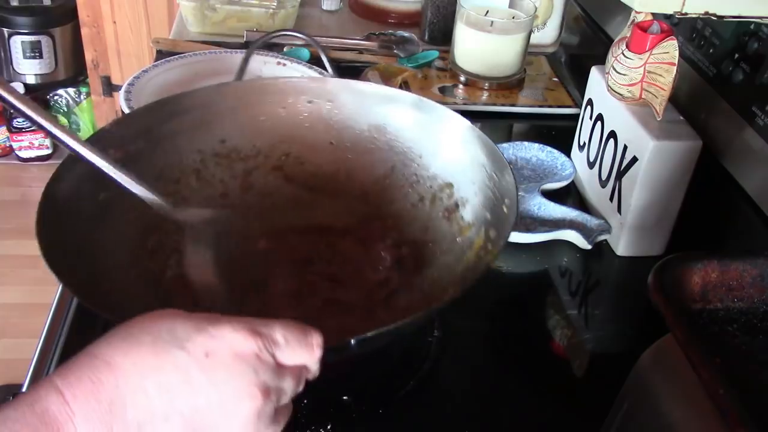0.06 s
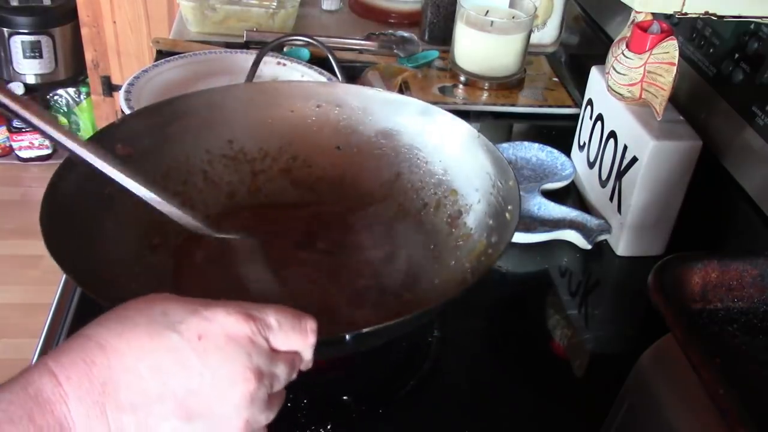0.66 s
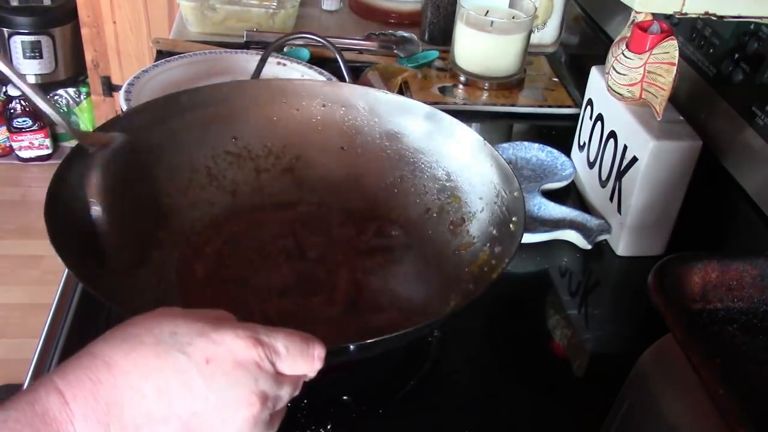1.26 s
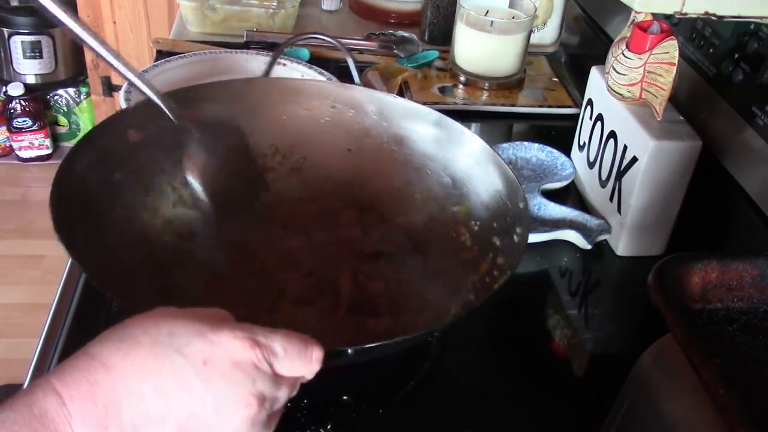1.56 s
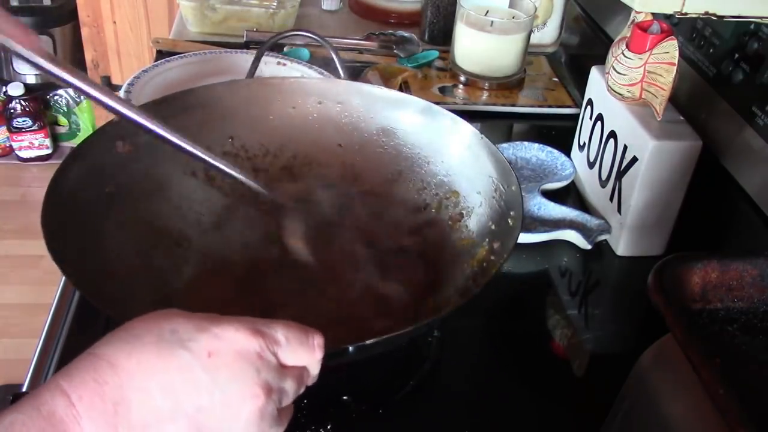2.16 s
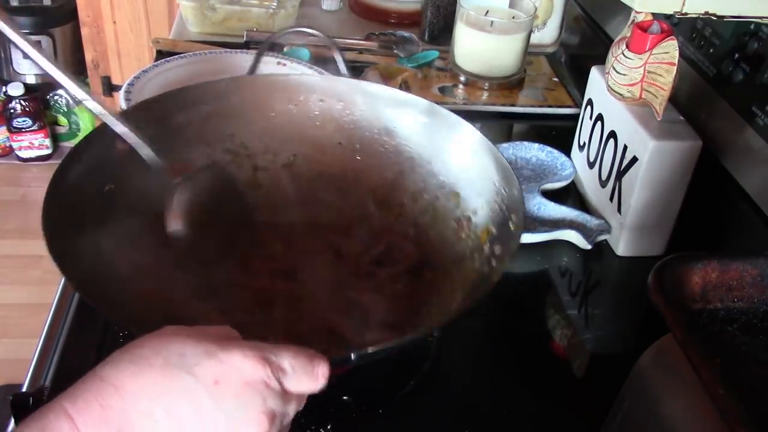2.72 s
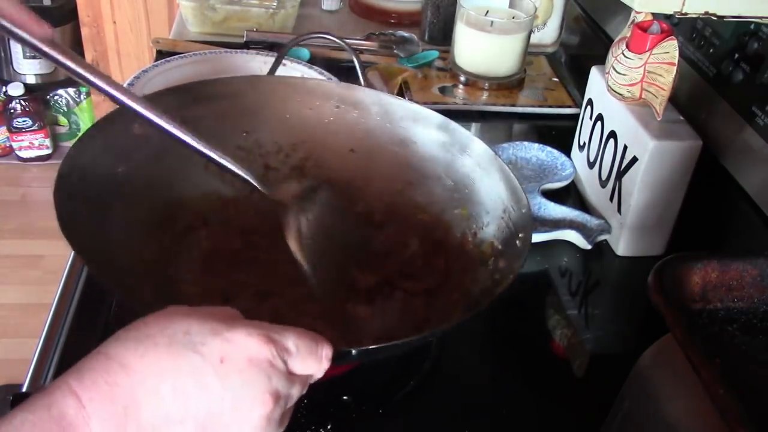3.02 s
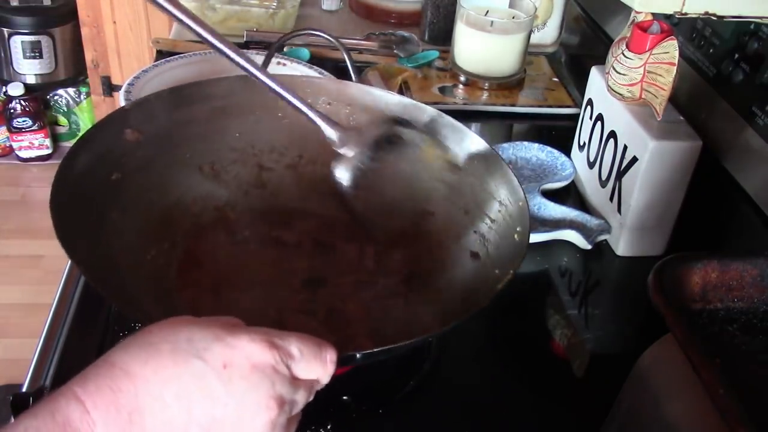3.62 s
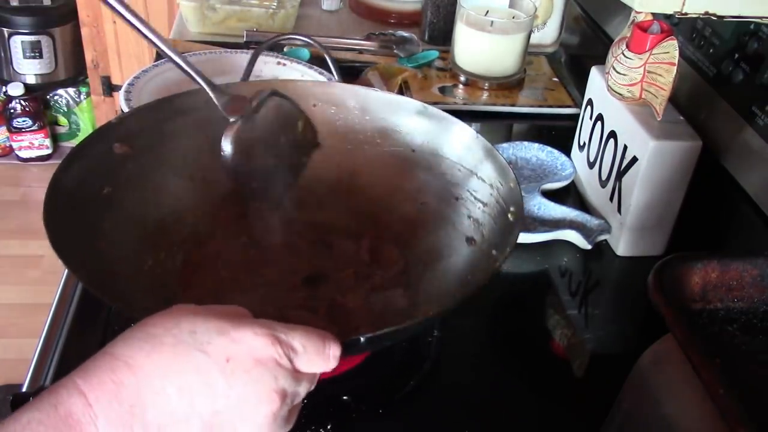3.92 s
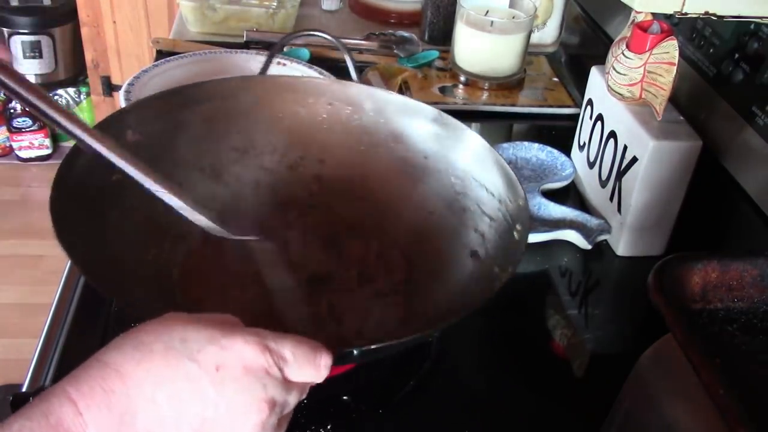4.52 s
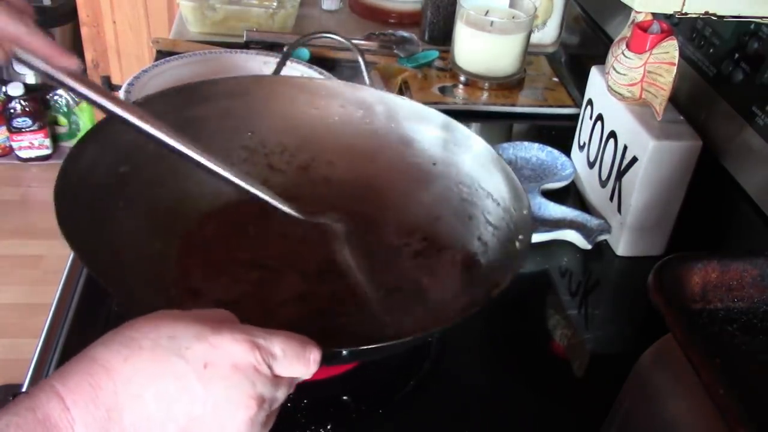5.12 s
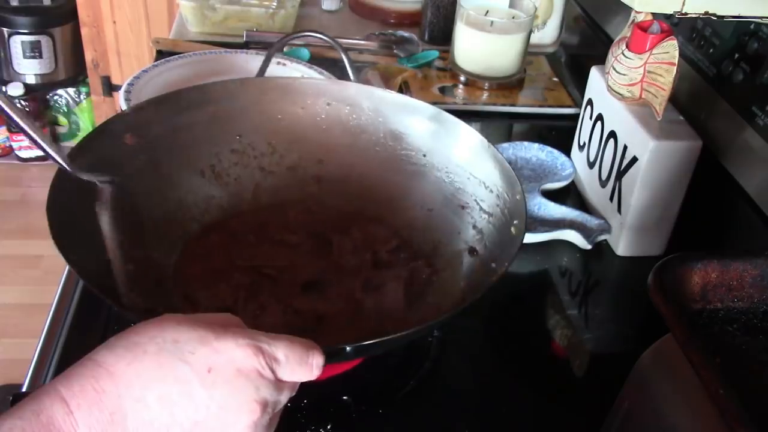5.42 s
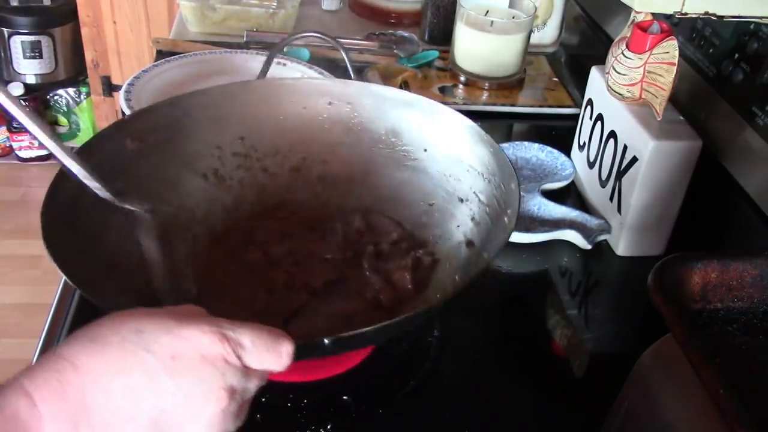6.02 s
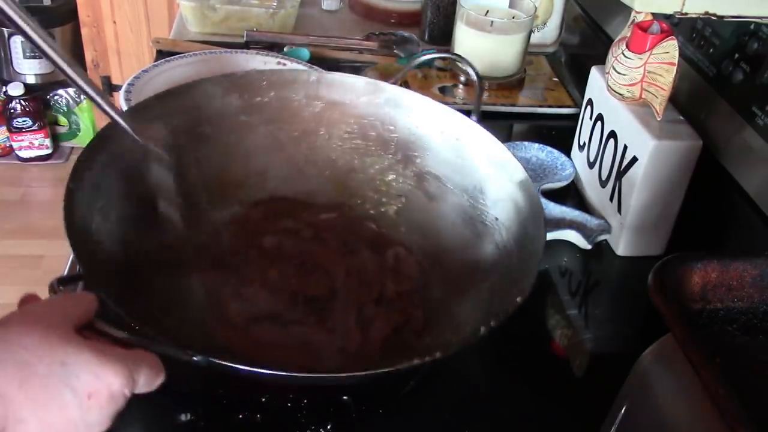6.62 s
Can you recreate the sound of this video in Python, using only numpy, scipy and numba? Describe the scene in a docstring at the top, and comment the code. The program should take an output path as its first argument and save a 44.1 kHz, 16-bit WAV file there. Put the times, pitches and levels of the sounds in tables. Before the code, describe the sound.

A long steel ladle clanks and scrapes in a wok, stirring faintly sizzling food, the metal ringing briefly between strokes.

```python
"""A short sizzle and a soft bump, then close clanks: a long steel ladle stirs food in a hand-held wok.
Each stroke lands with a clank that favours a few of the wok's own tones (its modes), skids, then is
pushed through the food; the bowl's resonances glide with the point of contact.
Ladle and wok ring on faintly between strokes. The wok bumps on the hob, and the food sizzles and
spits on the hot steel, over the steady low noise of a small kitchen."""
import sys
import numpy as np
from scipy import signal
from scipy.fft import rfft, irfft, next_fast_len
from scipy.io import wavfile
from scipy.ndimage import uniform_filter1d, minimum_filter1d
from numba import njit

SR = 44100
rng = np.random.default_rng(int(sys.argv[2]) if len(sys.argv) > 2 else 0)


def inscribe(sig):
    """Save sig as 16-bit PCM at rate SR to the path in sys.argv[1].

    A 1-D sig is mono; a 2-D sig holds one channel per row.
    Samples are clipped to [-1, 1] before scaling.
    """
    pcm = np.round(np.clip(np.atleast_2d(sig).T, -1, 1) * 32767)
    wavfile.write(sys.argv[1], SR, pcm.astype(np.int16))


N = 298557
TIME = np.arange(N) / SR
THUD, BOWL, CLANG, EDGE = range(4)   # the wok's four pitch ranges, from low to high

# the ladle hits the wok:
# (time [s], edge level [dB], bowl level [dB], clang level [dB], clang pitch [Hz], skid length [s])
STRIKES = [(0.4763, -8, -20, -10.5, 1380, 0.11), (0.737, -21.5, -33.5, -24.5, 1140, 0.00079),
           (1.1313, -7.5, -21.5, -18, 1407, 0.0043), (1.3695, -17.5, -31.5, -27.5, 1510, 0.0087),
           (1.6926, -3.5, -21, -14.5, 1336, 0.057), (1.7206, -2.5, -23, -33, 1733, 0),
           (2.2163, -34.5, -35, -30.5, 1385, 0), (2.4676, -12.5, -13, -13, 1230, 0.012),
           (2.597, -32, -39, -38, 1450, 0.046), (3.3389, -10.5, -15, -11, 1360, 0.017),
           (3.422, -24, -29, -20, 1306, 0.0053), (3.503, -18.5, -48, -56.5, 1270, 0),
           (3.704, -19, -34.5, -16, 1255, 0), (3.76, -24, -40.5, -27.5, 1260, 0.052),
           (3.885, -50, -40.5, -37, 1266, 0), (4.2289, -7, -13.5, -9.5, 1325, 0.028),
           (4.6248, -20, -35, -25.5, 1350, 0.02), (4.8744, -24.5, -26.5, -28.5, 1250, 0),
           (5.3649, -7.5, -20.5, -13, 1282, 0.075), (5.396, -4, -18.5, -13, 1400, 0.027),
           (5.5483, -20.5, -21.5, -22, 1200, 0.028), (5.617, -20.5, -45.5, -31.5, 1492, 0),
           (5.9184, -3, -15.5, -9, 1350, 0.058), (6.262, -8, -17.5, -12, 1347, 0.0086),
           (6.3738, -25, -24.5, -26.5, 1580, 0.051), (6.4376, -23.5, -26.5, -27.5, 1250, 0.00041),
           (6.7152, -5, -28, -15.5, 1895, 0), (6.7277, -2.5, -19, -37, 1650, .04)]


def from_db(db):
    """Turn decibels into a volume factor."""
    return 10 ** (np.asarray(db) / 20)


def unit_power(x):
    """Scale a sound to an average power of 1."""
    return x / np.sqrt(np.mean(x ** 2) + 1e-20)


def gain_at(colour, hz):
    """Read a tone colour, given as rows of (pitch [Hz], level [dB]), at any pitch."""
    colour = np.array(colour)
    return from_db(np.interp(np.log(hz + 1e-9), np.log(colour[:, 0]), colour[:, 1]))


def filtered(x, colour):
    """Give a sound a tone colour."""
    size = next_fast_len(N)
    return irfft(rfft(x, size) * gain_at(colour, np.fft.rfftfreq(size, 1 / SR)), size)[:N]


def band(x, which):
    """Keep one of the wok's four pitch ranges."""
    borders_hz = [110, 350, 1100, 2100, 16500]   # where the ranges begin and end (pitch [Hz])
    bandpass = signal.butter(3, borders_hz[which:which + 2], "band", fs=SR, output="sos")
    return signal.sosfilt(bandpass, x + 1e-18)


def add(out, s, sound):
    """Mix a sound in, starting at s seconds."""
    start = max(round(s * SR), 0)
    out[start:start + len(sound)] += sound[:N - start]


def fading_tone(t, hz, level_db, t60):
    """One ringing mode; t60 is the seconds it takes to fade by 60 dB."""
    return np.sin(2 * np.pi * hz * t) * from_db(level_db - 60 * t / t60)


def drift(per_s):
    """A random wander with a typical size of 1."""
    return unit_power(np.interp(TIME * per_s, np.arange(N // 20), rng.standard_normal(N // 20)))


def evened(x):
    """Flatten swells in loudness but keep the fine roughness."""
    return x / np.sqrt(np.abs(uniform_filter1d(x ** 2, SR // 36)) + 1e-12)


def clicks(per_s, spread_db):
    """Random clicks of very uneven size."""
    sizes = from_db(spread_db * np.minimum(rng.exponential(1, N), 5)) * rng.choice([-1, 1], N)
    return unit_power(sizes * (rng.random(N) < per_s / SR))


@njit
def vibrate(x, angle, decay):
    """Each sample, a vibration turns by an angle, shrinks a little and is pushed by x."""
    out, state = np.zeros(len(x)), 0j
    for i in range(len(x)):
        state = state * decay * np.exp(1j * angle[i]) + x[i]
        out[i] = state.real
    return out


def resonance(x, hz, width_hz):
    """Make x ring at a moving pitch and an even level; a smaller width gives a purer tone."""
    return evened(vibrate(x, 2 * np.pi * hz / SR, np.exp(-np.pi * width_hz / SR)))


def kitchen_noise(level_db):
    """The kitchen's steady, low background noise."""
    # (pitch [Hz], level [dB])
    colour = [(25, -42), (120, -1), (207, 0), (250, -9), (301, 0.5), (740, -6.5),
              (1100, -9), (3000, -14), (11500, -40), (15000, -51.5)]
    return from_db(level_db) * unit_power(filtered(rng.standard_normal(N), colour))


def room_echo(x, t60, cutoff_hz):
    """Dense, dull reflections from the walls of a small kitchen."""
    t = np.arange(SR // 2) / SR
    tail = rng.standard_normal(len(t)) * from_db(-60 * t / t60) * (t > .004)
    tail = signal.lfilter(*signal.butter(1, cutoff_hz, fs=SR), tail)
    return signal.oaconvolve(x, tail / np.linalg.norm(tail))[:N]


def sizzle_and_ticks(flare_db, tick_s, small_spit_db, small_spits):
    """Tiny bubbles burst where food meets hot steel; spitting fat and one ladle touch make ticks."""
    # the sizzle flares up: (peak time [s], rise [s], fall [s], level [dB])
    sizzles = [(.21, 0.16, 0.12, -43), (1.05, 0.15, 0.36, -58.5), (2.75, 0.13, 0.31, -57.5),
               (5.635, .008, 0.05, -39), (6.19, .08, .12, -50.5)]
    # tone colour of the bubbles: (pitch [Hz], level [dB])
    colour = [(1500, -2.5), (5400, 1), (7200, 0), (9000, -5.5), (12000, -12), (15500, -22)]
    # sharp ticks: drops of fat spit, and at 2.04 s the ladle touches the wok
    # (time [s], peak level [dB], pitch [Hz])
    ticks = [(1.496, -36, 8400), (1.546, -32, 3060), (2.0408, -21.5, 4000), (2.8835, -45, 9100),
             (6.557, -26.5, 7200)]
    flares = sum(from_db(db) * np.exp(-np.maximum((s - TIME) / rise_s, (TIME - s) / fall_s))
                 for s, rise_s, fall_s, db in sizzles)
    simmer = from_db(-75.5 - 4.5 * TIME)   # dies down as the food is turned
    bubbles = unit_power(filtered(clicks(per_s=9400, spread_db=2.0), colour))
    out = bubbles * np.hypot(from_db(flare_db) * flares, simmer)
    t = np.arange(SR // 25) / SR
    small = [(when * N / SR, small_spit_db + 12 * size ** 3, 3000 * 4 ** pitch)
             for when, size, pitch in rng.random((small_spits, 3))]
    for s, peak_db, hz in ticks + small:
        burst = rng.standard_normal(len(t)) * np.exp(-t / tick_s)
        pop = signal.sosfilt(signal.butter(2, [hz / 1.2, hz * 1.2], "band", fs=SR, output="sos"), burst)
        add(out, s, pop / np.abs(pop).max() * from_db(peak_db))
    return out


def hob_bumps(gain_db, rock_s):
    """The wok's round bottom rocks briefly on the hob and stirs its lowest modes."""
    # the wok meets the hob: (time [s], level [dB])
    bumps = [(0.144, -36.5), (0.574, -27), (1.386, -33.5), (2.892, -38.5), (5.549, -22), (5.599, -33.5),
             (6.456, -35)]
    # its lowest modes: (pitch [Hz], level [dB], fade time [s])
    modes = [(132, -6.5, 0.099), (167, -6, 0.16), (178, 7, 0.042), (291, -1, 0.083), (365, 2, 0.053)]
    out, t = np.zeros(N), np.arange(SR // 3) / SR
    body = sum(fading_tone(t, *mode) for mode in modes)
    for s, level_db in bumps:
        rocking = rng.standard_normal(len(t)) * t * np.exp(-t / rock_s)
        bump = band(band(signal.fftconvolve(rocking, body), THUD), THUD)
        add(out, s - rock_s, bump / np.abs(bump).max() * from_db(level_db + gain_db))
    return out


def after_rings():
    """A few modes ring on until the next ring starts; the ladle's two close tones make a wobble."""
    # ringing starts: (time [s], ladle level [dB], wok level [dB])
    rings = [(0.476, -44, -34), (1.72, -35, -36), (2.04, -58, -46), (2.467, -57, -40), (3.339, -37.5, -43),
             (4.229, -51, -46), (4.95, -58, -39), (5.919, -29.5, -37)]
    # long-lasting modes of each: (pitch [Hz], level [dB], fade time [s])
    ladle_modes = [(1669, -6, 2), (1691, 0, 2.1), (2735, -11, 1.4)]
    wok_modes = [(502, 2, .6), (727, -4.5, 2.1)]
    out = np.zeros(N)
    ends = [row[0] for row in rings[1:]] + [N / SR]
    for (s, ladle_db, wok_db), end in zip(rings, ends):
        t = np.arange(round((end - s) * SR)) / SR
        for modes, blow_db in ((ladle_modes, ladle_db), (wok_modes, wok_db)):
            for hz, level_db, t60 in modes:
                add(out, s, fading_tone(t, hz, blow_db + level_db, t60))
    return out


def wok_taps(count, width_hz, weak_db, weak_width_hz, width_per_khz, scatter_db):
    """The wok tapped at several places: always the same modes, but each place has its own mix."""
    # main modes of the wok with the ladle on it: (pitch [Hz], level [dB])
    modes = [(166, -16), (556, -3), (667.5, -11), (762, -11), (865, -10), (986, -8), (1263, -3), (1300, -6),
             (1345, -2), (1770, -13), (2251, -18), (2392, -14), (2733, -19), (3624, -13), (3711, -13),
             (4150, -10), (4328, -10), (4814, -13), (6528, -14), (6910, -14), (8507, -15)]
    # tone colour of its many weaker modes: (pitch [Hz], level [dB])
    colour = [(100, -35), (400, -8), (550, 3), (700, 2), (900, 4), (1100, -4), (1350, -3.5), (2000, -12),
              (3100, -2), (4300, 3.5), (5800, 0), (8500, -3.5), (11000, -4.5), (15500, -22)]
    t = np.arange(SR // 3) / SR
    hz, level_db = np.transpose(modes)
    weak_hz = np.linspace(np.sqrt(100), np.sqrt(16000), 360) ** 2 * rng.uniform(.99, 1.01, 360)
    strong = from_db(level_db + scatter_db * rng.standard_normal((count, len(hz))))
    strong *= rng.choice([-1, 1], strong.shape)
    weak = from_db(weak_db) * gain_at(colour, weak_hz) * rng.standard_normal((count, len(weak_hz)))
    widths = np.r_[np.full(len(hz), width_hz), weak_width_hz + width_per_khz * weak_hz / 1000]
    tones = np.sin(np.outer(2 * np.pi * np.r_[hz, weak_hz], t).astype("f4"))
    fades = np.exp(np.maximum(np.outer(-np.pi * widths, t), -40).astype("f4"))   # wider fades faster
    return np.hstack([strong, weak]) @ (tones * fades)


def whines(friction, gain_db):
    """Under pressure, rubbing makes one resonance swell, glide with the point of contact and fade."""
    # the rim whines: (time [s], length [s], level [dB], first pitch [Hz], last pitch [Hz])
    glides = [(2.04, 0.13, -33, 1750, 1920), (2.041, .14, -30, 2520, 2930), (2.091, 0.11, -26, 370, 388),
              (3.503, .16, -23.5, 1320, 1520), (3.536, 0.16, -25, 1200, 1225),
              (3.569, 0.17, -30.5, 2214, 2650), (4.314, 0.053, -22, 1315, 1416),
              (4.993, 0.082, -25, 1161, 1195)]
    out = np.zeros(N)
    for s, length_s, level_db, first_hz, last_hz in glides:
        progress = np.clip((TIME - s) / length_s, 0, 1)
        tone = resonance(friction, first_hz + (last_hz - first_hz) * progress, width_hz=first_hz / 70)
        out += tone * np.sin(np.pi * progress) * from_db(level_db + gain_db)
    return out


def slides(clock):
    """Each skid and push over time: gains (bowl, clang, edge) and pitches (low, middle, clang)."""
    # the ladle is pushed through the food: (time [s], length [s], bowl level [dB], clang level [dB],
    # edge level [dB], low pitch [Hz], middle pitch [Hz], glide [octaves/s])
    pushes = [(0.508, 0.03, -28.5, -32, -18, 603, 697, 0), (0.631, 0.099, -20, -44, -28, 453, 813, 0),
              (1.168, 0.018, -31.5, -16, -15, 544, 802, 0),
              (1.292, 0.049, -33.5, -32.5, -30, 503, 821, 2.5),
              (1.765, 0.17, -33.5, -35, -32.5, 488, 741, 0.5),
              (2.071, 0.1, -28.5, -34, -27.5, 380, 761, 0.3),
              (2.52, 0.0076, -21.5, -21.5, -23.5, 654, 830, -7),
              (3.434, 0.079, -27, -30.5, -27, 569, 873, 3), (3.555, 0.034, -19, -23.5, -25, 518, 882, -0.5),
              (3.623, 0.092, -33.5, -29, -27, 520, 874, 1.5), (3.747, 0.1, -41, -42, -45.5, 640, 700, -1.5),
              (4.333, 0.035, -23, -45, -32, 588, 950, -3.5), (4.404, 0.13, -29, -31.5, -32, 427, 976, -1),
              (4.54, 0.17, -34.5, -32, -36, 409, 803, -2), (4.829, 0.075, -39, -39, -38.5, 470, 780, 0.5),
              (4.922, 0.046, -18.5, -29, -23.5, 445, 792, -0.5),
              (4.971, 0.066, -17.5, -39, -29, 487, 960, 0.5), (5.493, 0.014, -22, -28, -25, 580, 763, 2.5),
              (6.05, 0.031, -21.5, -28, -32, 662, 766, -2)]
    # how fast a push swells and fades: (bowl [dB/s], clang [dB/s], edge [dB/s])
    swell_rates = [319.5, 334.5, 353.5]
    fade_rates = [262.5, 246.5, 312]
    # a skid's level compared with its blow: (bowl [dB], clang [dB], edge [dB])
    skid_db = [-7, -10, -16]
    # resonances where the ladle lands: (low [Hz], middle [Hz], clang [Hz])
    rest_hz = [549.7, 743.6, 1343]
    skid_rise_s, skid_fade_db_per_s = 0.0082, 209
    glide_reach_s, glide_shares = 0.078, [0.95, 1, 0.85]
    for s, edge_db, bowl_db, clang_db, clang_hz, skid_s in STRIKES:
        if skid_s > 0:
            rise = np.clip((clock - s) / skid_rise_s, 0, 1)
            fade = from_db(-skid_fade_db_per_s * np.maximum(clock - s - skid_s, 0))
            gains = from_db(np.add([bowl_db, clang_db, edge_db], skid_db))
            yield np.outer(gains, rise * fade), np.c_[[rest_hz[0], rest_hz[1], clang_hz]]
    for s, length_s, bowl_db, clang_db, edge_db, low_hz, middle_hz, glide_rate in pushes:
        loss_db = np.outer(swell_rates, np.maximum(s - clock, 0))
        loss_db += np.outer(fade_rates, np.maximum(clock - s - length_s, 0))
        octaves = glide_rate * np.clip(clock - s - length_s / 2, -glide_reach_s, glide_reach_s)
        pitches = np.c_[[low_hz, middle_hz, rest_hz[2]]] * 2 ** np.outer(glide_shares, octaves)
        # no sound until the ladle is down
        landed = max(when for when, *_, skid_s in STRIKES if when < s and skid_s > 0)
        yield from_db(np.c_[[bowl_db, clang_db, edge_db]] - loss_db) * (clock > landed), pitches


def ladle_motion():
    """Slides run into one another: their powers add, and the strongest leads the pitches."""
    clock = TIME[::32]
    moves = list(slides(clock))
    levels_db = 10 * np.log10(sum(gains ** 2 for gains, _ in moves) + 1e-12)
    weights = [gains[0] ** 2 + 1e-30 for gains, _ in moves]
    pitches = sum(weight * hz for weight, (_, hz) in zip(weights, moves)) / sum(weights)
    return [np.interp(TIME, clock, row) for row in (*levels_db, *pitches)]


def scrapes(taps, slips_per_s, judder_db, bend, singing_db):
    """The rim slips over the steel in tiny jerks; as it travels it stirs new modes and bends low ones."""
    # what sliding draws from the wok's edge, and plain grit: (pitch [Hz], level [dB])
    steel_colour = [(2400, 3), (2950, -8.5), (3550, -0.5), (7000, -7.5), (15000, -8)]
    grit_colour = [(1500, -13), (2400, 0), (3000, -9.5), (4300, 3), (6000, -4), (11000, -11.5),
                   (15500, -23.5)]
    bowl_db, clang_db, edge_db, low_hz, middle_hz, clang_hz = ladle_motion()
    friction = clicks(slips_per_s, spread_db=2.5) * from_db(judder_db * drift(per_s=75))
    place = TIME * 9 + drift(per_s=3)
    wok = np.zeros(N)
    for k, tap in enumerate(taps):
        nearness = np.cos(place + np.pi * k / len(taps)) ** 4
        wok += signal.oaconvolve(friction * nearness, tap)[:N]
    wavering_time = TIME + np.cumsum(bend * drift(per_s=8)) / SR
    bent = np.interp(wavering_time, TIME, wok, period=N / SR)

    # pressed harder, the gliding resonances sing out over the rest
    singing = from_db(singing_db + 0.5 * (bowl_db - bowl_db.max()))
    gliding = resonance(friction, middle_hz, width_hz=24)
    gliding += from_db(-5) * resonance(friction, low_hz, width_hz=15)
    thud = evened(band(band(bent, THUD), THUD))
    bowl = evened(evened(band(bent, BOWL)) + singing * band(gliding, BOWL)) + from_db(-22) * thud

    clang_glide = band(resonance(friction, clang_hz, width_hz=68), CLANG)
    clang = evened(evened(band(bent, CLANG)) + from_db(-1.5) * clang_glide)

    steel = evened(filtered(band(wok, EDGE), steel_colour))
    grit = unit_power(filtered(friction, grit_colour))
    edge_glide = band(resonance(friction, 3.15 * clang_hz, width_hz=25), EDGE)
    edge = evened(steel + from_db(-1.5) * grit + from_db(-8.5) * edge_glide)
    out = bowl * from_db(bowl_db - 3) + clang * from_db(clang_db - 3) + edge * from_db(edge_db - 1.5)
    return out + whines(friction, gain_db=-3)


def favoured_modes(gain_db, step_db, t60, ping_t60):
    """A hard blow pings the rim, and the spot it lands on makes a few modes sing out."""
    # hard blows: (time [s], ping level [dB], strongest mode's level [dB], modes, strongest first [Hz])
    spots = [(0.4762, -21, -12, (1345, 1300, 1770, 2251, 4437, 3711)),
             (1.1319, -20, -13, (1345, 1300, 4814, 2392, 2733, 6910, 6528)),
             (1.6926, -25, -15, (3624, 1345, 6910, 4100, 6528, 556)), (2.4674, -50, -7, (1263, 762)),
             (3.34, -42, -15, (556, 1345, 1300)), (4.23, -40, -13, (1345, 1300, 556, 986)),
             (5.3649, -26, -13, (3711, 556, 1345, 8507, 4328, 667.5, 6528)),
             (5.9184, -22, -13, (1263, 556, 1345, 4328, 2392, 8507)), (6.262, -26, -15, (1345, 1770, 556)),
             (6.7152, -26, -17, (1790, 4150, 4542))]
    # tone colour of the rim's highest modes: (pitch [Hz], level [dB])
    rim_colour = [(9800, -12), (10700, -0.5), (11500, -16), (15500, -16)]
    out, t = np.zeros(N), np.arange(SR // 2) / SR
    rim_hz = np.geomspace(rim_colour[0][0], rim_colour[-1][0], num=50)
    rim = fading_tone(t, rim_hz[:, None], 0, ping_t60)
    for s, ping_db, level_db, modes in spots:
        strengths = gain_at(rim_colour, rim_hz) * rng.standard_normal(len(rim_hz))
        add(out, s, from_db(ping_db) * strengths / np.linalg.norm(strengths) @ rim)
        for rank, hz in enumerate(modes, 1):
            mode_db = level_db + gain_db - step_db * np.log2(rank)
            add(out, s, (-1) ** rank * fading_tone(t, hz, mode_db, t60))
    return signal.sosfilt(signal.butter(2, 350, "high", fs=SR, output="sos"), out + 1e-18)


def clanks(taps, contact_db, contact_t60, damping_t60, bounces_per_s, chatter_db, chatter_s):
    """The ladle lands and chatters; pressed on the steel, it adds its own clang and muffles the wok."""
    out, t = np.zeros(N), np.arange(taps.shape[1]) / SR
    attack = slice(SR // 40)   # the first 25 ms set the level
    for (s, edge_db, bowl_db, clang_db, clang_hz, _), tap in zip(STRIKES, taps):
        bounces = (rng.random(len(t)) < bounces_per_s / SR) * rng.standard_normal(len(t))
        force = from_db(chatter_db) * bounces * np.exp(-t / chatter_s)
        force[0] = 1   # the first hit
        clang = fading_tone(t, clang_hz, contact_db, contact_t60)
        body = (tap / np.std(tap[attack]) + clang) * from_db(-60 * t / damping_t60)
        blow = signal.fftconvolve(force, body)[:len(t)]
        levels_db = {THUD: bowl_db - 13, BOWL: bowl_db, CLANG: clang_db - 2, EDGE: edge_db - 11}
        for which, level_db in levels_db.items():
            part = band(blow, which)
            add(out, s, part / np.std(part[attack]) * from_db(level_db))
    return out


def scene():
    """Mix wok and kitchen in narrow stereo; left and right differ mostly in the treble."""
    # stereo width of the wok: (pitch [Hz], side level compared with the middle [dB])
    width = [(500, -30), (1300, -23), (5000, -17.5), (13000, -15)]
    side_delay_s = .0047
    taps = wok_taps(count=len(STRIKES) + 4, width_hz=15, weak_db=-12, weak_width_hz=24,
                    width_per_khz=0.6, scatter_db=3.5)
    near = clanks(taps[:len(STRIKES)], contact_db=-5, contact_t60=0.43, damping_t60=0.1,
                  bounces_per_s=900, chatter_db=-7.5, chatter_s=0.0086)
    near += scrapes(taps[len(STRIKES):], slips_per_s=5200, judder_db=4.5, bend=.022, singing_db=10.5)
    near += favoured_modes(gain_db=-1, step_db=2.5, t60=0.28, ping_t60=.09)
    near += after_rings()
    near += hob_bumps(gain_db=3, rock_s=0.013)
    near += sizzle_and_ticks(flare_db=0.5, tick_s=0.0044, small_spit_db=-53, small_spits=80)
    background = kitchen_noise(level_db=-49)
    all_round = kitchen_noise(level_db=-66.5)
    middle = near + from_db(-12.5) * room_echo(near, t60=0.26, cutoff_hz=6150)
    delayed = np.pad(middle, (round(side_delay_s * SR), 0))[:N]
    side = filtered(delayed, width) + all_round
    return (middle + background + np.array([side, -side])) * from_db([[.1], [-.1]])


def record(dry):
    """A quick limiter turns down the loudest blows, and the highest treble is cut."""
    window, cutoff_hz = round(.003 * SR), 16200
    needed_gain = 1 / np.maximum(np.abs(dry).max(axis=0), 1)
    gain = uniform_filter1d(minimum_filter1d(needed_gain, window), window)
    return signal.sosfilt(signal.ellip(10, .1, 90, cutoff_hz, fs=SR, output="sos"), dry * gain)


dry = scene()
out = record(dry)
inscribe(out)
```